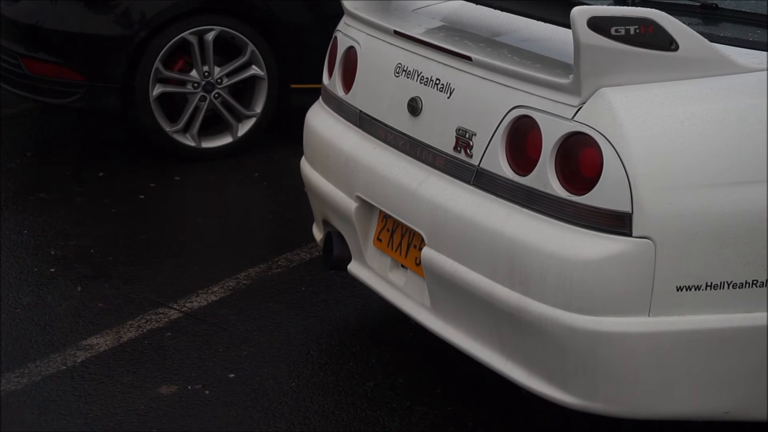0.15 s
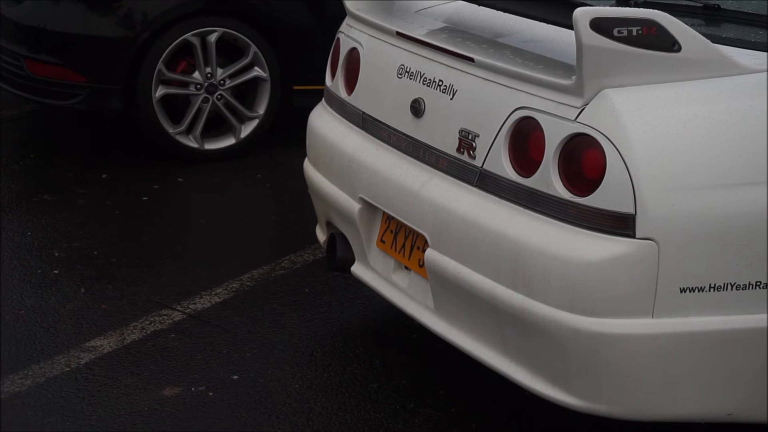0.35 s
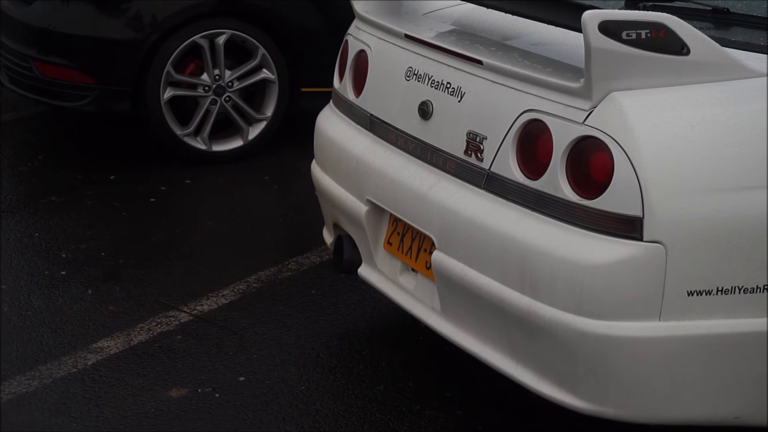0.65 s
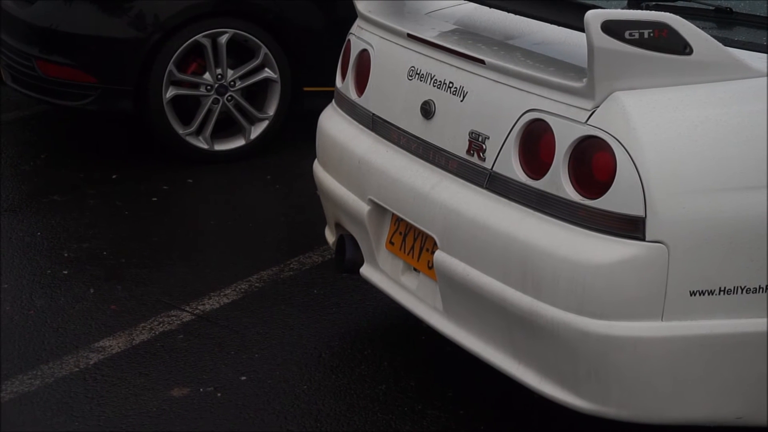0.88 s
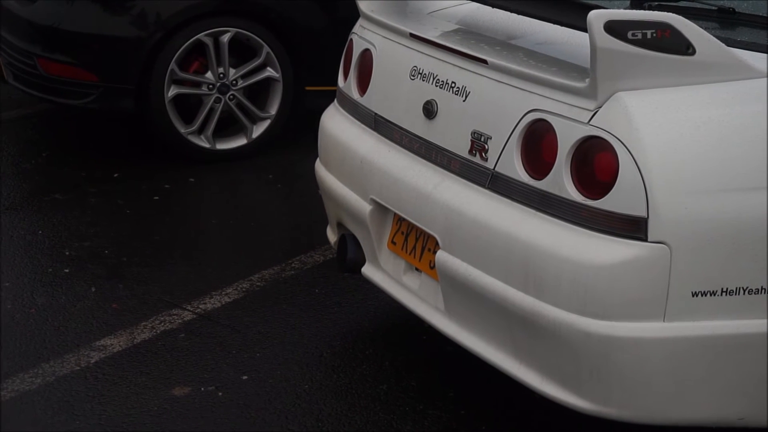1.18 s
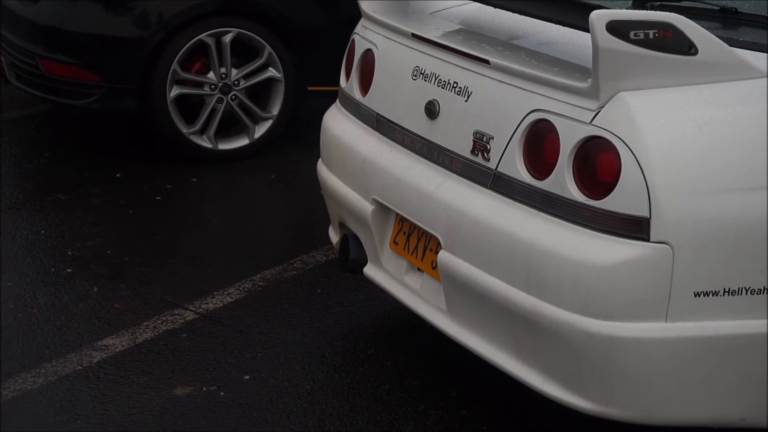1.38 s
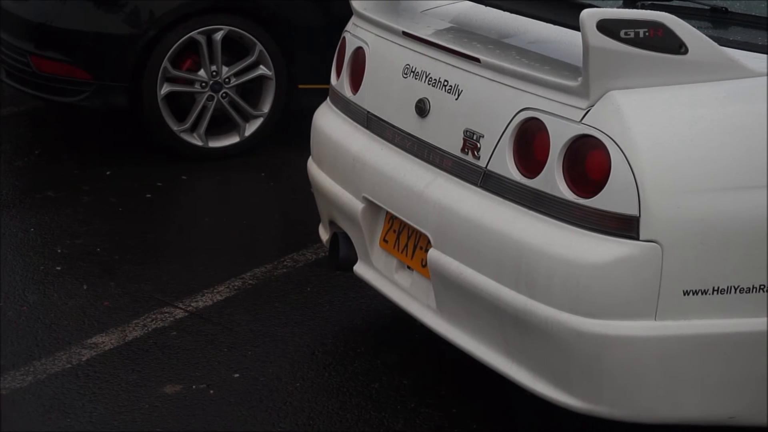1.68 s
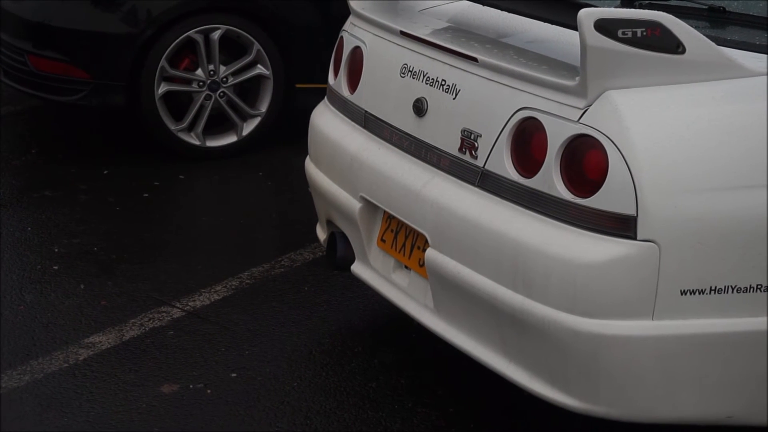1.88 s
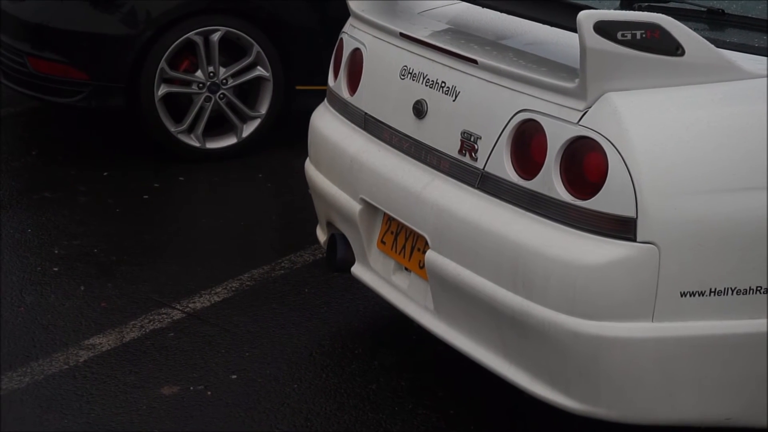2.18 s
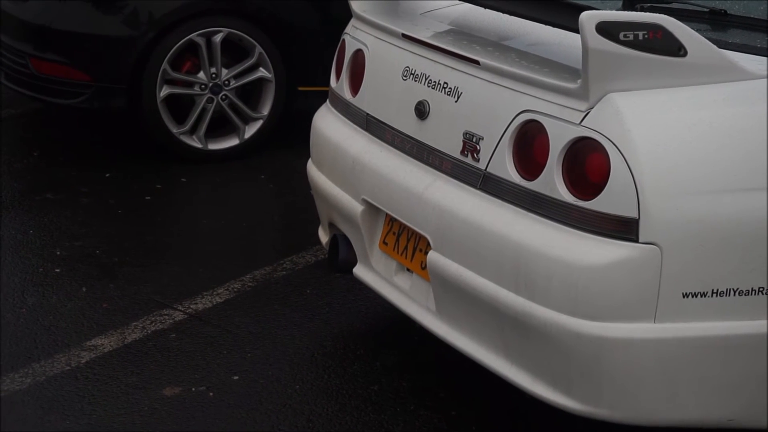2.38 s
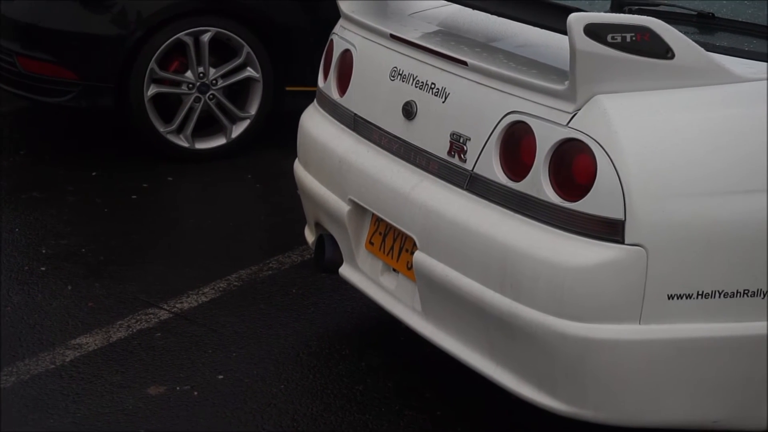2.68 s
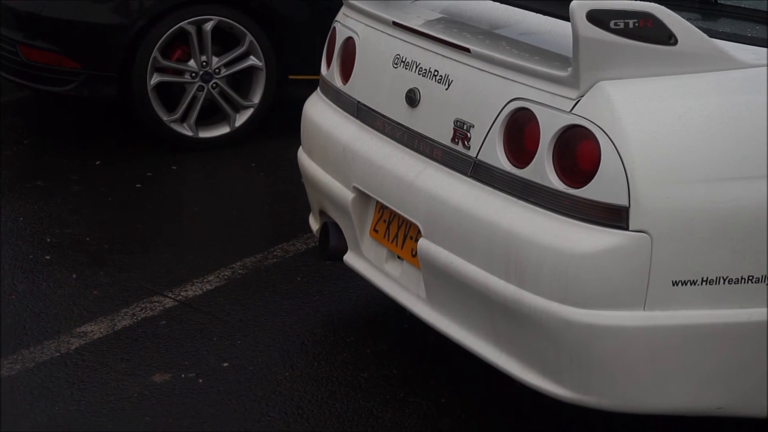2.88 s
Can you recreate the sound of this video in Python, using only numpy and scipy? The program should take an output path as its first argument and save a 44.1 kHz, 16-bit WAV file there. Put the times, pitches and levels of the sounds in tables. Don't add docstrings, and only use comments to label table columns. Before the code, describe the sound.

Close stereo microphones beside a car's exhaust outdoors catch a buzzing, breathy rev sliding down in pitch, a quick cluster of pops, then a stronger throbbing idle with small gaps and light gas spits.

```python
import sys
import numpy as np
from scipy import signal
from scipy.fft import rfft, irfft, next_fast_len
from scipy.io import wavfile
from scipy.ndimage import uniform_filter1d

SR = 44100
rng = np.random.default_rng(int(sys.argv[2]) if len(sys.argv) > 2 else 0)


def master_out(mix):
    frames = np.transpose(np.atleast_2d(mix))
    ceiling = np.clip(frames, -1, 1)
    pcm = np.round(ceiling * 32767).astype(np.int16)
    wavfile.write(sys.argv[1], SR, pcm)


def makeup_ratio(level_db):
    decades = np.asarray(level_db, float) / 20
    return 10 ** decades


N = 134505

# (time [s], exhaust strokes [1/s])
STROKE_RATE = [(0, 268), (.19, 239.6), (.38, 213.5), (.57, 189), (.76, 166), (.95, 143.5), (1.14, 122),
               (1.33, 104.6), (1.52, 89.5), (1.71, 78.8), (1.9, 74), (2.09, 68.5), (2.28, 65.5),
               (2.66, 64.6), (2.85, 65), (3.05, 65.6)]
# (time [s], drone level [dB], rasp level [dB])
PUMPING_LEVELS = [(0, -32, -29), (.1, -34.5, -39), (.25, -28, -27.5), (.38, -31, -23), (.47, -40, -23),
                  (.57, -31.5, -19), (.66, -24.5, -24), (.78, -27.5, -22.5), (.92, -27, -26),
                  (1.06, -26, -28), (1.28, -27.5, -27), (1.5, -28.5, -32.5), (1.9, -32, -35),
                  (2.3, -29, -41.5), (3.05, -55, -36.5)]
# (time [s], share [0-1])
RASP_NOISE_SHARE = [(0, .6), (.3, .42), (.45, .3), (.6, .3), (.72, .75), (1.3, .7), (3.05, .85)]
CYLINDER_LEVELS = [0.6, -1.4, 0.6, -2.1, -1.5, 1.5]
# (frequency [Hz], width [Hz], level [dB])
DRONE_PIPE = [(150, 25, -13), (176.5, 76, 22), (218, 78, 7), (283, 47, -48.5)]
# (frequency [Hz], width [Hz], level [dB])
RASP_PIPE = [(360, 7.2, -19.5), (437.5, 39, 14.5), (506, 44, 8), (557.5, 56, 13.5), (628, 10, 5),
             (780, 53, -7.5), (991, 38, 5), (1140, 300, -18), (1296, 35, -1), (1730, 44, -21.5)]
PUMP_JITTER, PUMP_SCATTER_DB = .014, 1.4

# (time [s], level [dB])
GAS_FLOW = [
    (0, -37),
    (.15, -38.5),
    (.5, -41.5),
    (1, -46.5),
    (1.5, -49.5),
    (1.9, -52.5),
    (2.3, -50.5),
    (3.05, -46),
]
# (frequency [Hz], level [dB])
ROAR_COLOUR = [(50, -57.5), (110, -41), (190, -1.5), (450, 7), (700, -5), (1100, -0.5), (1650, -5),
               (1850, -49), (2600, -70)]
# (frequency [Hz], level [dB])
HISS_COLOUR = [(1400, -52), (1750, -1), (2800, 1), (3500, -5), (3900, -8), (6400, -12), (7000, -36.5),
               (9000, -62.5)]
# (frequency [Hz], level [dB])
FIZZ_COLOUR = [(5500, -24.5), (6900, 2), (8400, -2.5), (10300, 2.5), (11500, -2), (13300, -4),
               (13900, -7.5), (15600, -10.5)]
ROAR_DB, ROAR_GROWS = -31.5, 0.24
HISS_DB, HISS_GROWS = -46.5, 0.94
FIZZ_DB, FIZZ_GROWS = -64, 2.04
GATE_DEPTH, PUFF_S = .1, .008
ROAR_PUFF_DB, PUFF_DB = -1.5, -14
PATCH_DB = 1.9

# (frequency [Hz], level [dB])
RUMBLE_COLOUR = [(15, -43.5), (30, -10.5), (60, -3.5), (110, -3), (200, -29), (400, -92.5)]
RUMBLE_DB, RUMBLE_RISE_S = -54.5, 1.2

# (time [s], peak level [dB])
LONE_CATCHES = [
    (1.2111, -16.5),
    (1.3078, -19.5),
    (1.3177, -9.5),
    (1.3367, -9),
    (1.3548, -11),
    (1.3847, -8),
    (1.4041, -11),
    (1.425, -10.5),
]
# (time [s], peak level [dB])
UNEVEN_CATCHES = [(1.5547, -10), (1.5892, -8.5), (1.6126, -6), (1.6481, -8), (1.6968, -9), (1.7349, -8.5),
                  (1.748, -6.5), (1.7868, -8), (1.8413, -6.5), (1.8544, -14), (1.8823, -5), (1.8955, -6.5),
                  (1.9098, -7.5), (1.936, -8.5), (1.9498, -5.5), (1.9779, -10.5), (1.9911, -14.5),
                  (2.006, -10), (2.0207, -10.5), (2.0494, -7.5), (2.079, -9), (2.1075, -8.5),
                  (2.122, -11.0), (2.152, -11), (2.1818, -10.5), (2.197, -9)]
# (time [s], peak level [dB])
IDLE_BURNS = [(2.2275, -8.5), (2.2421, -10.5), (2.2577, -7.5), (2.2882, -13), (2.3027, -8), (2.3186, -9.5),
              (2.3337, -8.5), (2.3639, -7.5), (2.3792, -9.5), (2.4098, -8), (2.4251, -11), (2.4401, -6),
              (2.472, -11.0), (2.4872, -8), (2.5029, -6.5), (2.518, -8.5), (2.5483, -6), (2.5634, -7),
              (2.5947, -7.5), (2.61, -10.5), (2.6253, -6), (2.6561, -9), (2.6731, -8), (2.6883, -5.5),
              (2.7039, -9.5), (2.7345, -4), (2.75, -9), (2.7654, -8.5), (2.7808, -5.5), (2.7962, -9),
              (2.8112, -10), (2.842, -9), (2.8574, -8.5), (2.8721, -7.5), (2.8884, -9.5), (2.9182, -3.5),
              (2.9336, -5.5), (2.9484, -13), (2.964, -7), (2.9793, -8.5), (2.994, -8), (3.0246, -8.5),
              (3.04, -9)]
# (frequency [Hz], level [dB], decay t60 [s])
CATCHING_PIPE = [(177, 10, .046), (229, 13, .028), (280, -7, .092), (374, 0, .027), (426, -5.5, .052),
                 (640, -25, .07)]
# (frequency [Hz], level [dB], decay t60 [s])
IDLE_PIPE = [(183, 8.5, .043), (229, 9, .032), (272, 7, .033), (325, -7.5, .11), (258, -12, .11),
             (456, -15, .1), (441, 5, .03), (556, -17, .09), (650, -17.5, .1)]
WARM_FROM_S, WARM_TO_S = 2.11, 3.02
BLOW_S, PUSH_HZ = .008, 114.4
THUMP_DB, THUMP_HZ, THUMP_WIDTH_HZ = -51, 62, 26

# (time [s], level [dB], length [s])
GAS_SPITS = [
    (1.385, -71, .012),
    (2.038, -66.5, .025),
    (2.21, -61.5, 0.02),
    (2.355, -66.5, .025),
    (2.459, -71, .006),
    (2.55, -60.5, 0.018),
    (2.588, -64, 0.017),
]
# (frequency [Hz], level [dB])
SPIT_COLOUR = [(2500, -40), (4000, -4), (6000, 0), (8500, -6), (11500, -12), (13000, -30), (15000, -80)]
# (time [s], level [dB], length [s])
TICKS = [
    (2.7295, -46, .003),
    (3.0485, -40, .004),
]
# (frequency [Hz], level [dB])
TICK_BRIGHTNESS = [(3000, -40), (5000, -4), (9500, 0), (11000, -4), (13000, 0), (15000, -8), (16500, -60)]
SPIT_RISE_S, SPIT_FALL_S = .003, .006

# (delay [s], level [dB])
ECHOES = [
    (.0165, -24),
    (.027, -15),
    (.043, -20),
    (.055, -24),
]
# (frequency [Hz], correlation [-1 to 1])
MIC_LIKENESS = [(60, .998), (200, .999), (400, .985), (700, .95), (1400, .84), (2400, .15), (6000, -.1),
                (8500, .25), (13000, .7)]
# (frequency [Hz], level [dB])
LEFT_OVER_RIGHT = [(200, 0), (400, -.5), (750, -1), (1300, -3), (2400, -5.5), (4400, -10), (7500, 0),
                   (15000, 0)]


def unit(x):
    return x / np.sqrt(np.mean(x ** 2) + 1e-20)


def along(points, hz):
    f, v = np.transpose(points)
    return np.interp(np.log(hz + 1), np.log(f + 1), v)


def curves(rows):
    s, *cols = np.transpose(rows)
    return [np.interp(np.arange(N) / SR, s, c) for c in cols]


def filtered(x, response):
    m = next_fast_len(N + SR // 2)
    return irfft(rfft(x, m) * response(np.fft.rfftfreq(m, 1 / SR)), m)[..., :N]


def band(lo_hz, hi_hz):
    zpk = signal.butter(4, [lo_hz, hi_hz], "bandpass", analog=True, output="zpk")
    return lambda f: signal.freqs_zpk(*zpk, f)[1]


def pipe(modes):
    return lambda f: sum(makeup_ratio(db) * 1j * f * w / (c * c - f * f + 1j * f * w) for c, w, db in modes)


def pipe_gain(modes):
    power = sum(width * makeup_ratio(2 * db) for _, width, db in modes)
    return np.sqrt(SR / np.pi / power)


def train(seconds, sizes):
    at = np.clip(np.asarray(seconds) * SR, 0, N)
    i = at.astype(int)
    early = np.bincount(i, sizes * (1 + i - at), N + 2)
    late = np.bincount(i + 1, sizes * (at - i), N + 2)
    return (early + late)[:N]


def rush(spectrum):
    z = signal.stft(rng.standard_normal((2, N)), nperseg=512)[2]
    field = rng.standard_normal(z.shape[1:])
    for axis in (0, 1):
        field = uniform_filter1d(field, size=6, axis=axis)
    pair = signal.istft(z * makeup_ratio(PATCH_DB * unit(field)), nperseg=512)[1][:, :N]
    return unit(filtered(pair, lambda hz: makeup_ratio(along(spectrum, hz))))


def pumping(turns):
    drone_db, rasp_db = curves(PUMPING_LEVELS)
    k = np.arange(1, int(turns[-1]))
    luck = rng.standard_normal((len(k), 2))
    times = np.interp(k + PUMP_JITTER * luck[:, 0], turns, np.arange(N) / SR)
    sizes = makeup_ratio(np.take(CYLINDER_LEVELS, k % 6) + PUMP_SCATTER_DB * luck[:, 1])
    strokes = train(times, sizes)
    strokes = strokes / np.sqrt(np.abs(uniform_filter1d(strokes ** 2, size=2048)) + 1e-9)
    gated = unit(rng.standard_normal(N) * (1 + np.cos(2 * np.pi * turns)) ** 2)
    share = curves(RASP_NOISE_SHARE)[0]
    rasp = np.sqrt(1 - share) * strokes + np.sqrt(share) * gated
    low = filtered(makeup_ratio(drone_db) * strokes, lambda f: band(120, 335)(f) * pipe(DRONE_PIPE)(f))
    high = filtered(makeup_ratio(rasp_db) * rasp,
                    lambda f: band(365, 1700)(f) * band(300, 1800)(f) * pipe(RASP_PIPE)(f))
    return pipe_gain(DRONE_PIPE) * low + pipe_gain(RASP_PIPE) * high


def gas(turns, fired):
    flow_db = curves(GAS_FLOW)[0]
    swing_db = flow_db - flow_db.mean()
    age = np.arange(SR // 20) / SR / PUFF_S
    puff = signal.fftconvolve(fired, age * np.exp(1 - age * 2))[:N]
    pulse = 1 + GATE_DEPTH * np.cos(2 * np.pi * turns)
    roar_gate = unit(pulse + makeup_ratio(ROAR_PUFF_DB) * puff)
    treble_gate = unit(pulse + makeup_ratio(PUFF_DB) * puff)
    roar = roar_gate * makeup_ratio(ROAR_DB + ROAR_GROWS * swing_db) * rush(ROAR_COLOUR)
    hiss = treble_gate * makeup_ratio(HISS_DB + HISS_GROWS * swing_db) * rush(HISS_COLOUR)
    fizz = treble_gate * makeup_ratio(FIZZ_DB + FIZZ_GROWS * swing_db) * rush(FIZZ_COLOUR)
    return roar + hiss + fizz


def rumble():
    rise = np.minimum(np.arange(N) / SR / RUMBLE_RISE_S + 0.16, 1)
    return makeup_ratio(RUMBLE_DB) * rise * rush(RUMBLE_COLOUR)


def firings():
    t, db = np.transpose(LONE_CATCHES + UNEVEN_CATCHES + IDLE_BURNS)
    return train(t, makeup_ratio(db))


def pop_shape(modes):
    age = np.maximum(np.arange(SR // 6) / SR - .02, 0)
    hz, db, t60 = np.transpose(modes)[..., None]
    decay = makeup_ratio(db - 60 * age / t60)
    ring = -np.sum(decay * np.sin(2 * np.pi * hz * age) * (1 - np.exp(-age / BLOW_S)), axis=0)
    ring = filtered(ring, lambda f: np.abs(band(PUSH_HZ, 800)(f)))[:len(age)]
    top = np.argmax(ring)
    return ring / ring[top], top


def pops(fired):
    warm = np.clip((np.arange(N) / SR - WARM_FROM_S) / (WARM_TO_S - WARM_FROM_S), 0, 1)
    out = makeup_ratio(THUMP_DB) * unit(filtered(fired, pipe([(THUMP_HZ, THUMP_WIDTH_HZ, 0)])))
    for share, modes in ((1 - warm, CATCHING_PIPE), (warm, IDLE_PIPE)):
        shape, top = pop_shape(modes)
        out = out + signal.fftconvolve(fired * share, shape)[top:top + N]
    return out


def spits(events, colour):
    t = np.arange(N) / SR
    shape = np.zeros(N)
    for s, db, length in events:
        rise = (t - s) / SPIT_RISE_S
        fall = (s + length - t) / SPIT_FALL_S + 1
        shape += makeup_ratio(db) * np.clip(np.minimum(rise, fall), 0, 1)
    return shape * rush(colour)


def echoes(tone):
    return filtered(tone, lambda f: sum(makeup_ratio(db) * np.exp(-2j * np.pi * f * s) for s, db in ECHOES))


def microphones(x, other):
    def gains(hz):
        u = np.arccos(np.clip(along(MIC_LIKENESS, hz), -.9, 1)) / 2
        g = makeup_ratio(along(LEFT_OVER_RIGHT, hz) * np.array([[.5], [-.5]]))
        norm = np.hypot((g[0] + g[1]) * np.cos(u), (g[0] - g[1]) * np.sin(u)) / 2
        return g * np.cos(u) / norm, g * np.sin(u) * np.array([[1], [-1]]) / norm
    return filtered(x, lambda hz: gains(hz)[0]) + filtered(other, lambda hz: gains(hz)[1])


def scene():
    turns = np.cumsum(curves(STROKE_RATE)[0]) / SR
    fired = firings()
    tone = pumping(turns) + pops(fired)
    echo = echoes(tone)
    noise = gas(turns, fired) + rumble()
    noise = noise + spits(GAS_SPITS, SPIT_COLOUR) + spits(TICKS, TICK_BRIGHTNESS)
    return microphones(tone + echo + noise[0], unit(echo) * np.std(tone) + noise[1])


def roll_off(x):
    return signal.sosfilt(signal.butter(12, 15700, fs=SR, output="sos"), x)


def record(dry):
    mix = filtered(dry, lambda f: (1j * f / (40 + 1j * f)) ** 2)
    return roll_off(mix)


dry = scene()
out = record(dry)
master_out(out)
```